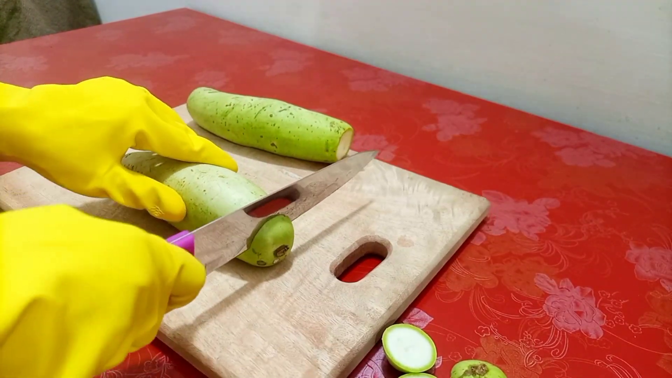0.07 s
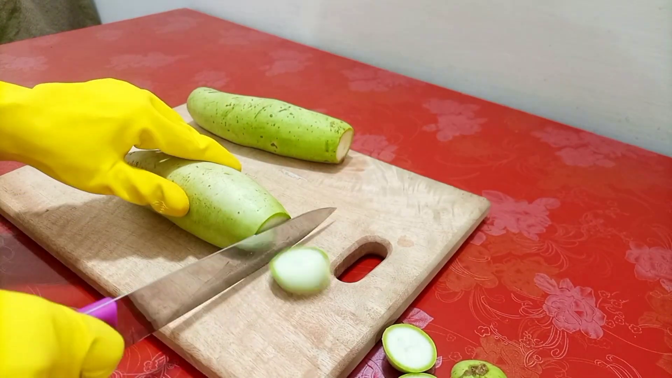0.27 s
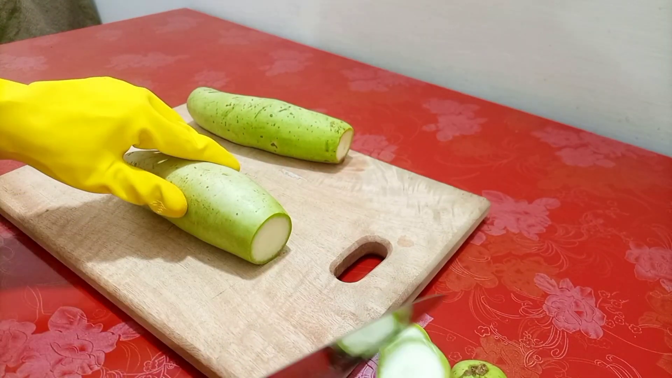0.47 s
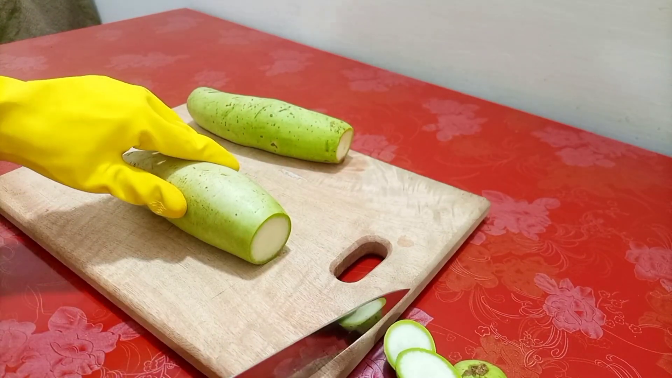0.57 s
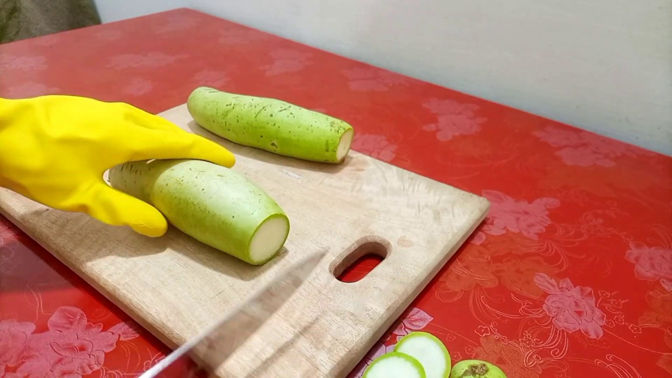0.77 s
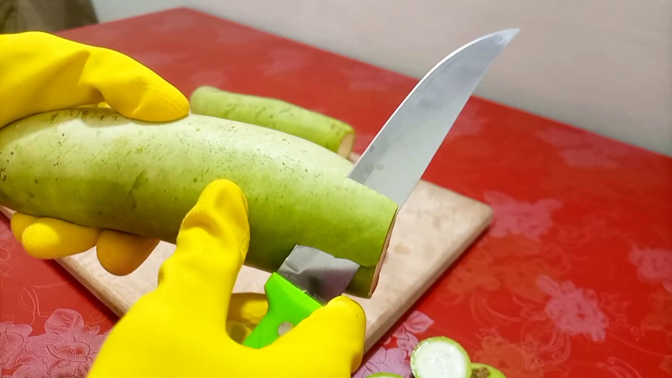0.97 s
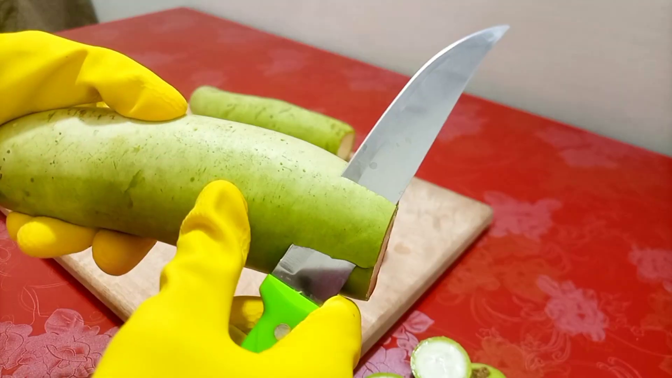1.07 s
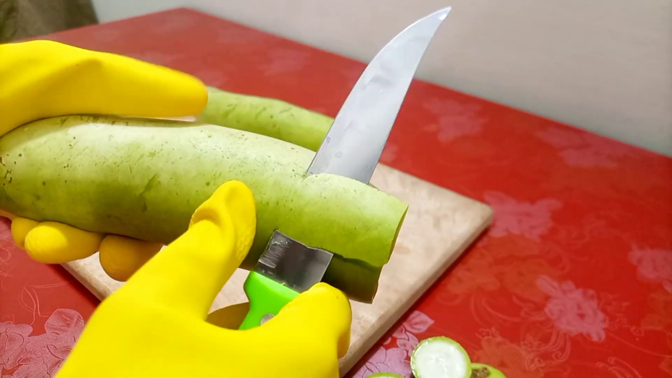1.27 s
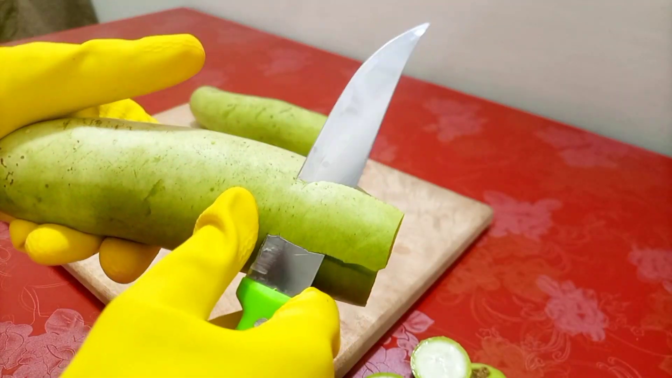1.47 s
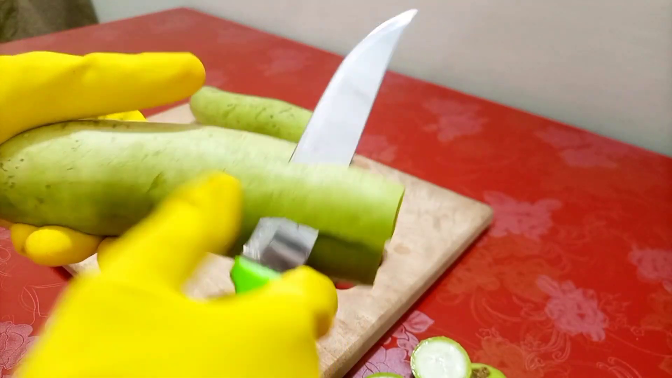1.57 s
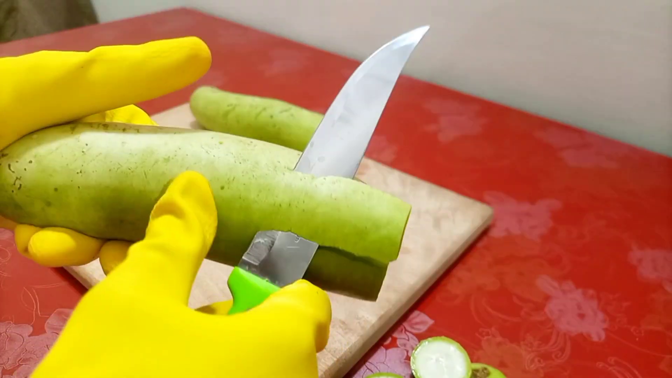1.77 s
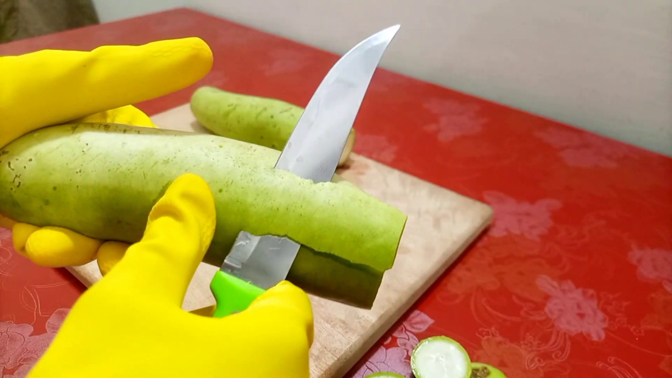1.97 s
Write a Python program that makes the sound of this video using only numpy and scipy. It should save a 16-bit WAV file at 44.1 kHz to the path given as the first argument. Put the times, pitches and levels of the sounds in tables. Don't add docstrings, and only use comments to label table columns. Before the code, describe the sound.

A knife chop on a wooden board: faint hum and hiss, then at 0.23 s a sharp, loud knock with a tiny flesh split, quick blade chatter and short hard-room reflection. Low table bumps and faint glove rustles and squeaks follow from 0.4 s; a slice lands softly at 0.61 s. A ten-millisecond dropout comes at 0.84 s, then very quiet handling, with small squeaks near 1.1-1.2 s.

```python
import sys
import numpy as np
from scipy import signal
from scipy.fft import rfft, irfft, next_fast_len
from scipy.io import wavfile
from scipy.ndimage import map_coordinates

SR = 44100
rng = np.random.default_rng(int(sys.argv[2]) if len(sys.argv) > 2 else 0)


def persist_wave(psi):
    counts = np.round(np.clip(psi, -1, 1) * 32767).astype(np.int16)
    wavfile.write(sys.argv[1], SR, np.atleast_2d(counts).T)


def amplitude_ratio(level_db):
    exponent = np.asarray(level_db, float) / 20
    return 10 ** exponent


N = 88200

# f/Hz, rms level/dB, phase drift/rad
HUM_LINES = [(301, -69.5, 0.92), (361.4, -79.5, 3), (625, -80, 2.96), (1290, -78.5, 3.4)]
# f/Hz, density level/dB
LOW_HISS_SPECTRUM = [(25, -32), (110, -7.5), (190, -14.5), (250, -18.5), (340, -12.5), (530, -20),
                     (640, -14), (1000, -14.5)]
# f/Hz, density level/dB
HISS_SPECTRUM = [(1000, -6.5), (2000, -4), (3900, -6.5), (4600, -9), (5100, -15.5), (8200, -39),
                 (13800, -48.5), (15200, -30)]
# start t/s, level/dB, f/Hz, length t/s
SQUEAKS = [
    (.48, -56, 612, 0.032),
    (.51, -60, 790, 0.021),
    (.53, -59.5, 904, 0.0253),
    (1.095, -60, 1350, 0.026),
    (1.21, -62, 625, 0.036),
]
# start t/s, level/dB, f/Hz, length t/s
RUSTLES = [
    (0.216, -69, 6800, 0.0089),
    (0.41, -62, 4850, 0.029),
    (0.432, -84, 8800, .008),
    (0.711, -68, 4070, 0.0206),
    (1.146, -80, 7750, .008),
    (1.896, -79, 7940, .008),
]
# start t/s, peak level/dB, f/Hz, length t/s
WOBBLES = [(.07, -50, 98.56, 0.0667), (.15, -52.5, 87, 0.025), (.234, -30, 148.5, 0.015),
           (.258, -40.5, 91.8, 0.0491), (.382, -34, 121, 0.0162), (.399, -36, 93.3, 0.027),
           (.414, -39, 153, 0.014), (.425, -36.5, 125, 0.027), (.45, -48.5, 90, 0.027),
           (.541, -41, 86.6, 0.0365), (.573, -39.5, 173, 0.0168), (.611, -32.5, 117.6, .028),
           (.64, -48, 99, 0.028), (.662, -36.5, 167, 0.02), (.675, -44, 87.2, 0.045),
           (.72, -59, 91.6, 0.038), (.757, -42.5, 92, 0.0493), (.825, -50.5, 93, 0.043),
           (.872, -43, 103.2, 0.0257), (.888, -38, 111.2, .036), (.92, -53, 83.1, 0.056),
           (1.215, -50, 59.3, 0.037), (1.293, -50.5, 71, 0.052), (1.33, -50.5, 81.5, 0.032),
           (1.603, -49, 60.2, 0.044), (1.785, -45.5, 76, 0.0386), (1.845, -52.5, 106, 0.063),
           (1.965, -62, 64.5, .035)]
# f/Hz, density level/dB
RUMBLE_SPECTRUM = [(20, -12), (60, 2.5), (120, 4), (200, -4), (350, -14), (600, -63)]
# f/Hz, density level/dB
SLICE_SPECTRUM = [(150, -36), (250, -5.5), (425, -14), (668, 1.5), (951, -14.5), (1300, -8), (1530, -9.5),
                  (2150, -11.5), (3500, -48), (4550, -67), (7700, -120)]
# start t/s, peak level/dB, f/Hz, length t/s
TAPS = [
    (.611, -46, 310, .03),
    (.613, -43, 610, .012),
    (.618, -35, 680, .016),
    (.621, -46, 1200, .012),
    (.626, -41, 1280, .013),
    (.634, -48, 1290, .014),
]
# f/Hz, density level/dB
ECHO_SPECTRUM = [(88, -38), (150, -5), (830, -5), (1100, -14.5), (1320, -6.5), (1720, -7), (1860, -6),
                 (2620, -2.5), (6170, -27.5), (8020, -53), (13600, -120)]
# f/Hz, T60 t/s
ROOM_T60 = [(200, .12), (700, 0.15), (2200, 0.1654), (4500, 0.11), (8000, 0.073)]
# t/s after the blow, level/dB
CONTACTS = [
    (0, 5.5),
    (.0004, 5.5),
    (.0017, -5),
    (.0029, 3),
    (.0038, -4.5),
    (.0053, -6),
    (.0062, -3),
    (.0078, -14),
]
# f/Hz, width f/Hz, level/dB
KNOCK_MODES = [(1830, 410, 0), (3308, 640, -1.5), (4410, 750, -5)]
# f/Hz, width f/Hz, level/dB
THUD_MODES = [(360.23, 36, -0.5), (550, 44.1, -5.5), (683, 21, -4), (844, 39, -2.5), (1075, 29, -6)]
# f/Hz, width f/Hz, level/dB
BOARD_MODES = [(1370, 160, -7), (1730, 210, 2.5), (1980, 400, -0.5), (3170, 390, -1), (3270, 100, -2),
               (4740, 590, -10.5), (5400, 400, -13)]
# f/Hz, width f/Hz, level/dB
DENT_MODES = [(720, 420, 0)]
# f/Hz, density level/dB
CLICK_SPECTRUM = [(6000, -43.5), (8200, -43.5), (10000, -56), (13500, -56), (15000, -45.5)]

CHOP_S, DROP_S = 0.2329, 0.612


def unit(x):
    return x / np.sqrt(np.mean(x ** 2) + 1e-20)


def peaked(x, db):
    return amplitude_ratio(db) * x / abs(x).max()


def along(points, hz):
    f, v = np.transpose(points)
    return np.interp(np.log(hz + 1), np.log(f + 1), v)


def wander(rate):
    knots = rng.standard_normal(int(N * rate / SR) + 4)
    return map_coordinates(knots, [np.arange(N) * rate / SR])


def filtered(x, response):
    m = next_fast_len(N + SR // 2)
    return irfft(rfft(x, m) * response(np.fft.rfftfreq(m, 1 / SR)), m)[:N]


def body(modes):
    def response(f):
        total = 0
        for k, (centre, width, db) in enumerate(modes):
            damping = 1j * f * width
            total = total + (-1) ** k * amplitude_ratio(db) * damping / (centre ** 2 - f ** 2 + damping)
        return total
    return response


def tinted(spectrum):
    return unit(filtered(rng.standard_normal(N), lambda hz: amplitude_ratio(along(spectrum, hz))))


def swell(start, rise, t60, hold=0):
    t = np.arange(N) / SR - start
    attack = np.sin(np.pi / 2 * np.clip(t / rise, 0, 1)) ** 2
    return attack * amplitude_ratio(-60 * np.clip(t - rise - hold, 0, None) / t60)


def gated(noise, envelope):
    shaped = noise * envelope
    return shaped * np.sqrt(np.sum(envelope ** 2) / np.sum(shaped ** 2))


def bursts(rows, rough, overtone_db, rate=60):
    out = np.zeros(N + SR)
    drift = rough * wander(rate)
    for s, db, hz, length in rows:
        i = round(s * SR)
        t = np.arange(round(length * SR)) / SR
        phase = 2 * np.pi * hz * t + rng.uniform(0, 2 * np.pi) + np.resize(drift[i:], len(t))
        tone = np.sin(phase) + amplitude_ratio(overtone_db) * np.sin(2 * phase)
        out[i:i + len(t)] += amplitude_ratio(db) * np.sin(np.pi * t / length) ** 2 * tone
    return out[:N]


def room_tone():
    t = np.arange(N) / SR
    hum = 0
    for hz, db, drift in HUM_LINES:
        level = np.sqrt(2) * amplitude_ratio(db + 0.5 * wander(3.4))
        hum = hum + level * np.sin(2 * np.pi * hz * t + drift * wander(14))
    low = amplitude_ratio(-67) * tinted(LOW_HISS_SPECTRUM + [(1200, -72.5)])
    high = amplitude_ratio(-62.5 + 0.5 * wander(2.3)) * tinted([(800, -65)] + HISS_SPECTRUM)
    return hum + low + high


def gloves():
    noise = rng.standard_normal(N)
    rustle = 0
    for s, db, hz, length in RUSTLES:
        band = filtered(noise, lambda f: np.exp(-((f / hz - 1) / 0.08) ** 2))
        rustle = rustle + amplitude_ratio(db) * gated(band, swell(s, length, 3 * length))
    return rustle + bursts(SQUEAKS, 0.43, overtone_db=-50, rate=150)


def table():
    rumble = tinted(RUMBLE_SPECTRUM)
    shake = 0
    for s, db, _, length in WOBBLES:
        shake = shake + amplitude_ratio(db) * gated(rumble, swell(s, length / 2, t60=0.14))
    return bursts(WOBBLES, 0.12, overtone_db=-20) + amplitude_ratio(-13) * shake


def drop():
    tumble = gated(tinted(SLICE_SPECTRUM), swell(DROP_S, 0.0071, t60=0.12))
    return amplitude_ratio(-40.5) * tumble + bursts(TAPS, 0.76, overtone_db=-30)


def echo():
    start = CHOP_S + 0.011
    hz, t, z = signal.stft(tinted(ECHO_SPECTRUM)[:SR // 2], SR, nperseg=256)
    decay = amplitude_ratio(-60 * t / along(ROOM_T60, hz)[:, None])
    tail = signal.istft(z * decay, SR, nperseg=256)[1]
    out = np.zeros(N)
    out[round(start * SR):][:len(tail)] = tail
    return amplitude_ratio(-25) * out * swell(start, 0.0053, t60=0.34, hold=0.049)


def dull(hz):
    x = hz / 5400
    return 1 / (1 + 1j * x / 0.6 - x ** 2) / (1 + 1j * x / 1.2 - x ** 2)


def steep(modes):
    return lambda hz: body(modes)(hz) * dull(hz) ** 2


def strike():
    blows = np.zeros(N)
    for s, db in CONTACTS:
        blows[round((CHOP_S + s) * SR)] = amplitude_ratio(db)
    knock = filtered(blows, steep(KNOCK_MODES))
    first = (np.arange(N) == round(CHOP_S * SR)) * 1.0
    thud = filtered(first, lambda hz: body(THUD_MODES)(hz) / (1 + 1j * hz / 900))
    push = filtered(swell(CHOP_S, 0.0005, t60=0.001), body(DENT_MODES))
    return peaked(knock, -13.5) + peaked(thud, -20.5) + peaked(push, -13.5)


def scrape():
    grain = filtered(rng.standard_normal(N), steep(BOARD_MODES))
    split_s = 0.0079
    split = amplitude_ratio(-41) * gated(grain, swell(CHOP_S - split_s, split_s, t60=0.0043))
    rattle = amplitude_ratio(-24) * gated(grain, swell(CHOP_S, 0.00096, t60=0.025, hold=0.005))
    hit = rng.standard_normal(N) * swell(CHOP_S - 0.006, 0.0076, t60=0.012)
    click = filtered(hit, lambda hz: amplitude_ratio(along(CLICK_SPECTRUM, hz)) * (hz > 5800))
    return split + rattle + click


def chop():
    return strike() + scrape()


def scene():
    return (chop() + echo() + drop() + table() + gloves() + room_tone())[None]


def low_pass(x):
    return signal.sosfilt(signal.butter(12, 15500, fs=SR, output="sos"), x)


def record(dry):
    gap_s, stub_s, stub_end_s, fade_s, back_s = 0.838, 0.84, 0.8422, 0.844, 0.8484
    t = np.arange(N) / SR
    fading = 0.59 * dry * np.clip((t - fade_s) / (back_s - fade_s), 0, 1)
    in_stub = (t >= stub_s) & (t < stub_end_s)
    stub = dry - dry[:, in_stub].mean() - 0.007
    gap = np.where(in_stub, stub, fading)
    mix = np.where((t < gap_s) | (t > back_s), dry, gap)
    return low_pass(mix)


dry = scene()
out = record(dry)
persist_wave(out)
```